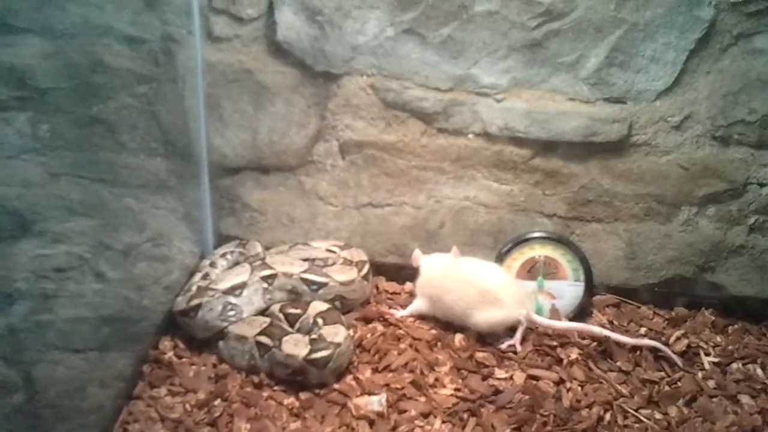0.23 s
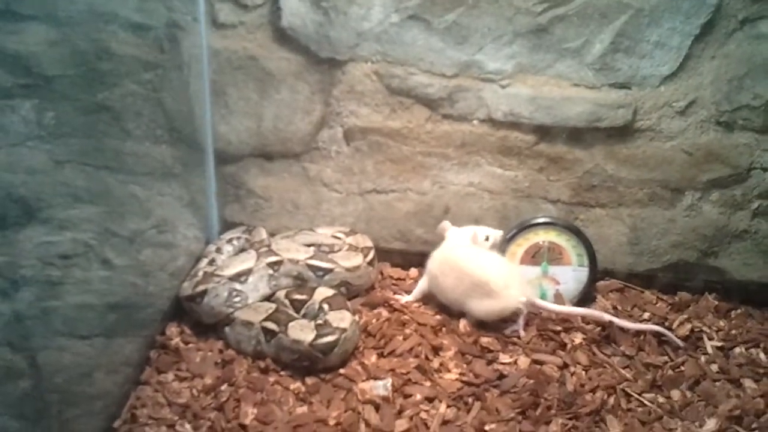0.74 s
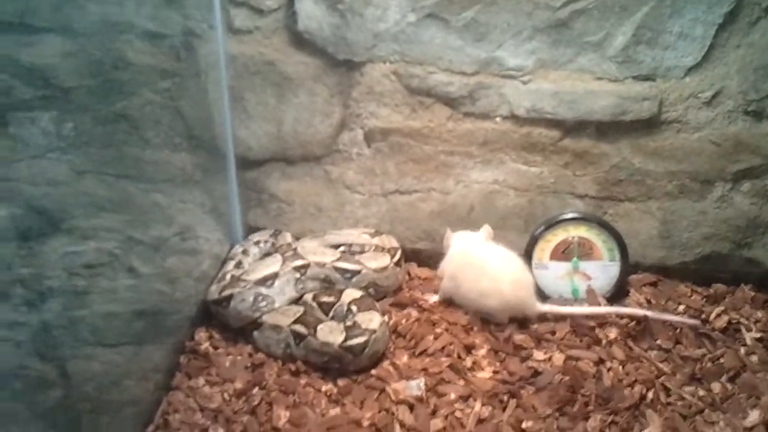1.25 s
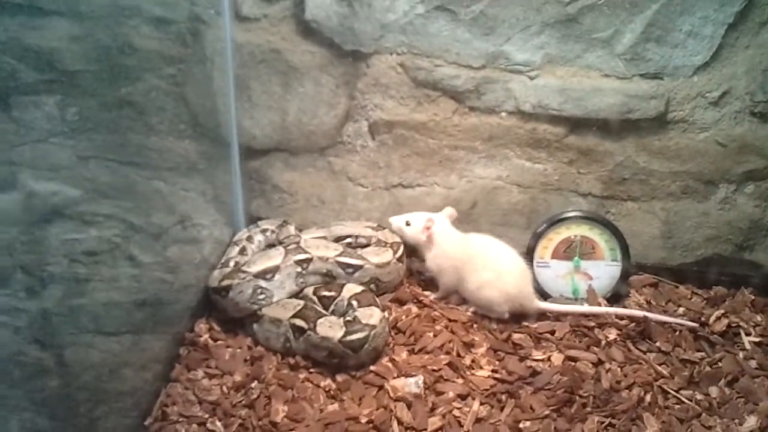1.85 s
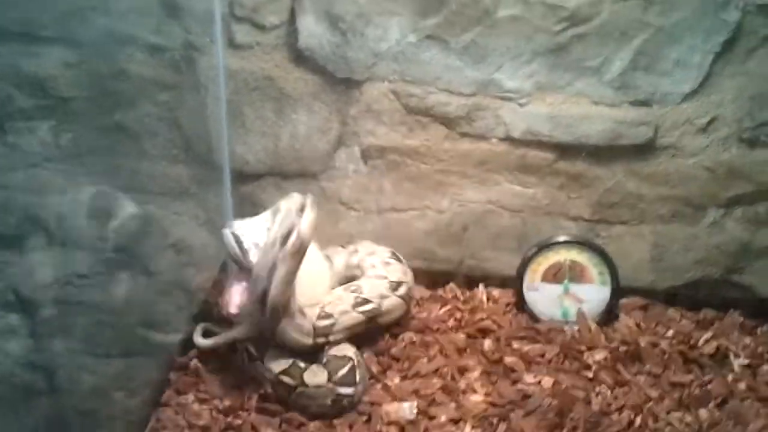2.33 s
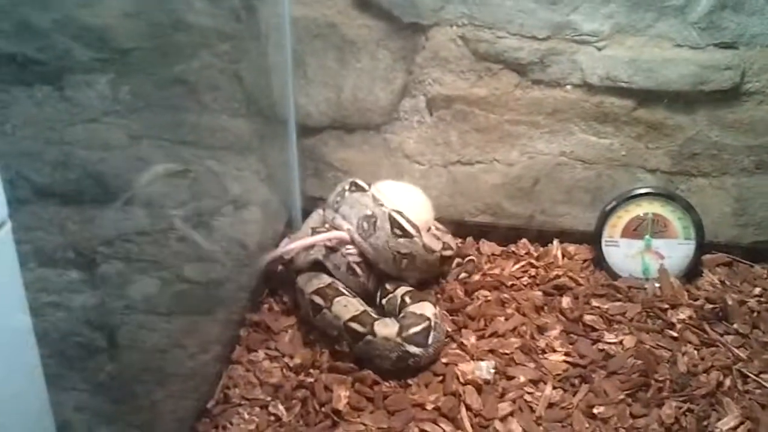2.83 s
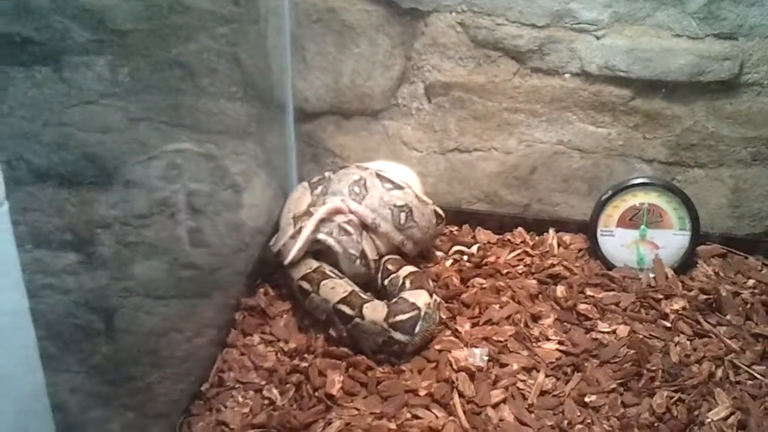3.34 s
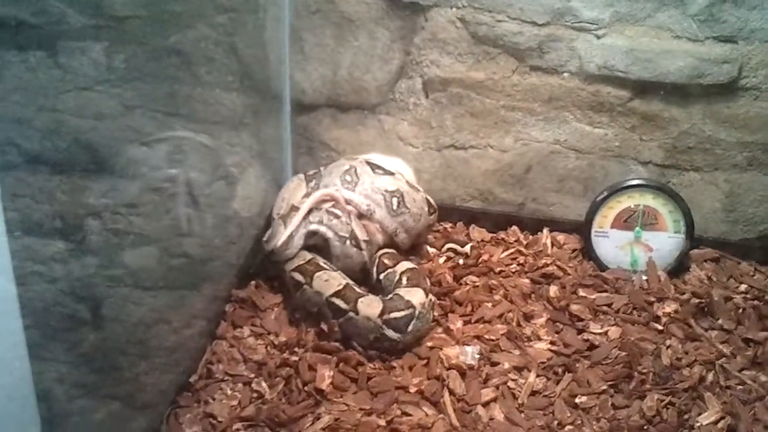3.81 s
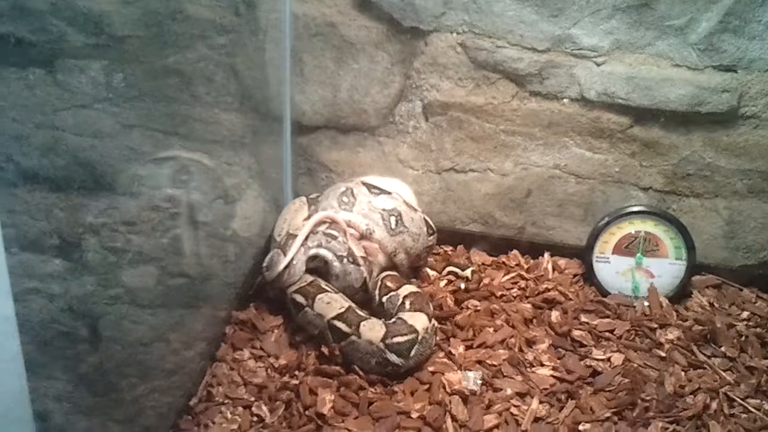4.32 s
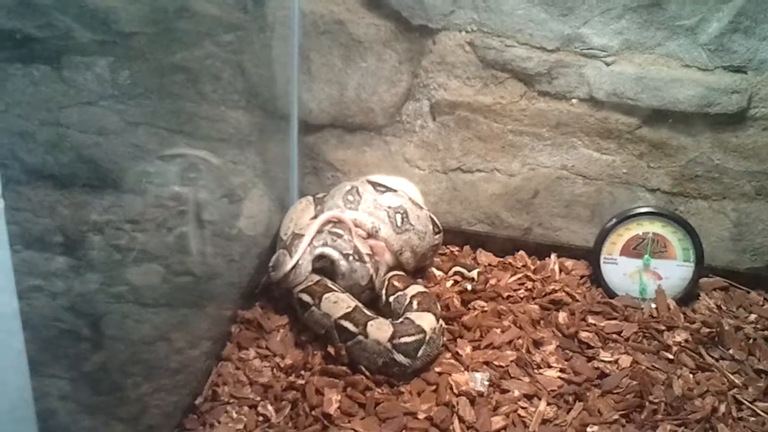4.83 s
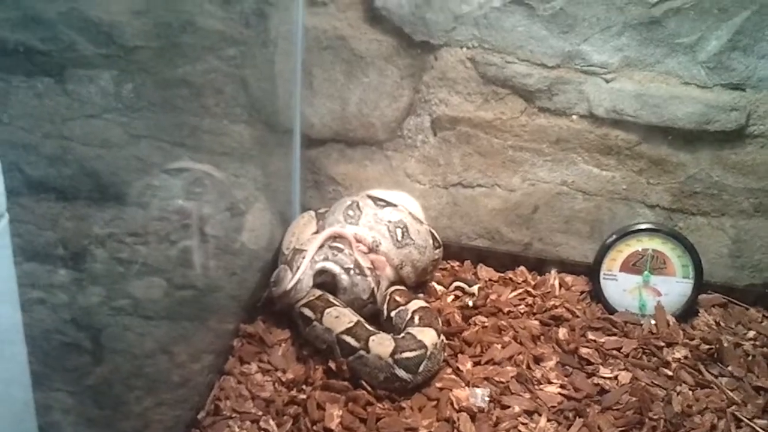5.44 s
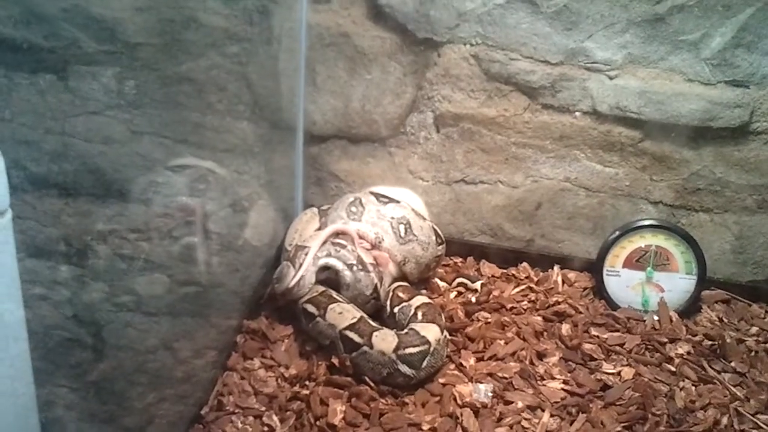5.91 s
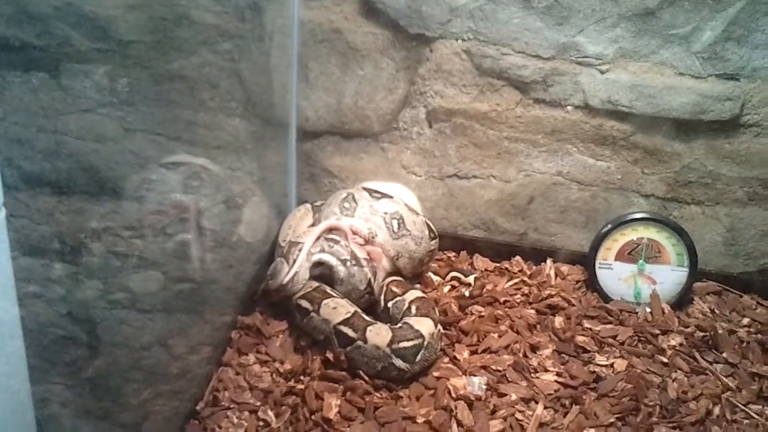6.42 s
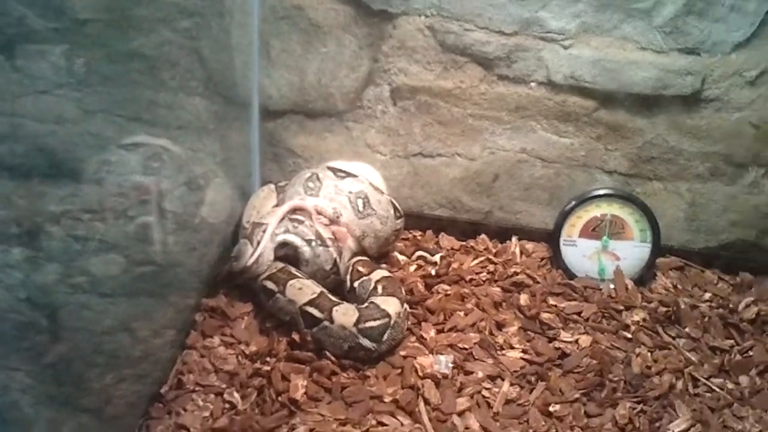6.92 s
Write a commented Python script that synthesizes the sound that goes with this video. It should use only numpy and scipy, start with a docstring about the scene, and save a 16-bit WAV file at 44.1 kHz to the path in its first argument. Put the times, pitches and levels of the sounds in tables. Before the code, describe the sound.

Over faint buzzing hum and hiss, bark chips stir, bodies thump glass, and a rat's trembling squeaks burst into piercing, rasping shrieks, then dwindle.

```python
"""Mains hum and microphone hiss first, and under all: one repeated cycle of overtones, and coloured noise.
Bark chips rustle (dense impulses); dry clicks come from close to the microphone (snap plus low swing).
Then a rat seized by a snake squeals in a glass tank: trembling near-sines break into rasping shrieks
(torn tones, resonated pulses and noise). Bodies thump the glass (decaying modes) over low rumble."""
import sys
import numpy as np
from scipy import signal
from scipy.fft import rfft, irfft, next_fast_len
from scipy.io import wavfile
from scipy.ndimage import uniform_filter1d

SR = 44100
rng = np.random.default_rng(int(sys.argv[2]) if len(sys.argv) > 2 else 0)


def file_out(sig):
    """Save sig as 16-bit WAV at sys.argv[1]."""
    # one column per channel
    cols = np.atleast_2d(sig).T
    # limit, then scale
    lim = np.clip(cols, -1, 1)
    pcm = np.round(lim * 32767).astype(np.int16)
    wavfile.write(sys.argv[1], SR, pcm)


def gain_from_db(level_db):
    """Turn a decibel level (scalar or array-like) into a linear amplitude factor."""
    decades = np.asarray(level_db, float) / 20
    return 10 ** decades


N = 315756

# strongest mains overtones, each set on the nearest multiple of MAINS_HZ: (frequency [Hz], level [dB])
HUM_LINES = [(118.4, -69), (360.7, -63), (597.5, -70), (839.8, -70), (958.2, -64.5), (1200, -74),
             (1319, -75), (3122, -78), (3359, -78), (3418, -76), (4317, -76), (4382, -76), (4560, -76),
             (4619, -76), (4678, -76), (4737, -73), (4802, -72), (4861, -76), (4980, -79), (5222, -80),
             (5642, -79), (5760, -75), (5879, -76), (6239, -79), (6638, -81), (6842, -80), (7197, -80),
             (7617, -80), (7951, -80), (8053, -81)]
# curve for all other overtones, before scatter and odd-overtone cut: (frequency [Hz], level [dB])
BUZZ_CURVE = [(60, -95.5), (400, -69), (1500, -82), (2500, -89), (4500, -88.5), (7500, -82.5), (9000, -110)]
# microphone hiss colour: (frequency [Hz], relative density [dB per Hz])
HISS_COLOUR = [(15, -43), (25, -22), (114, -10), (304, -5), (360, -7.5), (417, -8.5), (960, -10),
               (1080, -13.5), (1900, -14), (3870, -16), (4710, -15), (7880, -15), (8690, -25), (11300, -50),
               (19100, -120)]
# bark chips stirred: (start [s], length [s], rms at the peak [dB])
RUSTLES = [(1.27, 0.084, -50.5), (1.34, 0.062, -60), (1.4, 0.021, -52.5), (2.15, 0.061, -45),
           (2.21, 0.16, -44), (2.47, 0.037, -45.5), (2.58, 0.12, -56.5), (3.34, .033, -47)]
# colour of the chips: (frequency [Hz], relative level [dB])
BARK_COLOUR = [(240, -49), (400, -3.5), (802, -4), (878, -5), (2980, -12.5), (6300, -5), (8690, -19.5),
               (11300, -67), (19100, -120)]
# clicks, levels ahead of the bass cut: (time [s], low push peak [dB], bright snap peak [dB])
CLICKS = [(1.316, -50, -37), (1.346, -44, -44), (2.295, -44, -46), (2.454, -34, -26), (2.577, -44, -52),
          (3.692, -44, -46), (4.272, -37, -41), (6.820, -60, -33), (6.8278, -26, -15)]
# parts of a snap: (frequency [Hz], relative level [dB], t60 [s], peak delay [s])
SNAP_PARTS = [(1900, 0, .003, 0), (3200, -16, .003, 0), (4500, -2, .0035, -.0006), (6200, 0, .0025, .0002),
              (7500, -4, .003, -.0012)]
# the tank and hands shaking the microphone: (start [s], length [s], rms at the peak [dB])
RUMBLES = [(2.12, 0.57, -65), (2.66, 0.19, -57.5), (2.94, .24, -67), (3.44, 0.14, -55.5), (3.82, .14, -74),
           (4.0, 0.12, -74)]
# bodies hitting the glass: (time [s], peak [dB], centre of the blow's colour [Hz])
THUMPS = [(2.178, -41.5, 143), (2.326, -35, 460), (2.408, -30.5, 817), (2.454, -23.5, 617)]
# glass modes: (frequency [Hz], relative level [dB], t60 [s])
GLASS_MODES = [(148.6, 1, 0.38), (199, 1.5, 0.44), (379, -6.5, 0.45), (454, -7.5, 0.19), (595, -2.5, 0.13),
               (795, -7, 0.18), (1050, -9, 0.081), (1395, 10, 0.051), (2194, 18.5, 0.039)]
# how hard the rat pushes air, one list a call: (time [s], effort [dB])
EFFORT = [
    [(2.225, -48), (2.289, -42), (2.32, -42.5)],
    [(2.322, -49), (2.338, -31.5), (2.362, -35.5), (2.398, -45)],
    [(2.4, -67.5), (2.408, -39), (2.422, -39), (2.446, -40), (2.456, -29), (2.476, -55.5), (2.5, -47.5)],
    [(2.52, -54.5), (2.54, -37.5), (2.56, -31), (2.62, -58.5)],
    [(2.68, -57), (2.7, -26.5), (2.722, -16), (2.774, -12.5), (2.85, -33)],
    [(2.93, -35), (2.944, -33), (2.958, -23), (3.016, -24), (3.044, -27), (3.12, -30), (3.17, -53.5)],
    [(3.335, -48), (3.358, -47)],
    [(3.455, -54), (3.465, -37.5), (3.555, -36.5), (3.611, -31), (3.641, -30.5), (3.68, -50)],
    [(3.83, -77), (3.84, -48), (3.858, -39), (3.894, -34.5), (3.962, -37), (3.998, -52.5)],
    [(4.0, -54), (4.016, -45), (4.034, -42), (4.076, -43), (4.1, -72)],
    [(4.712, -64), (4.738, -45.5), (4.764, -46), (4.78, -37.5), (4.874, -39), (4.9, -59)],
]
# whistles start off pitch and settle: (start [s], length [s], level re effort [dB], first [Hz], settled [Hz])
WHISTLES = [(2.23, .03, -6, 3235, 3190), (2.258, .02, -6.5, 3507, 3480), (2.272, 0.038, -3.5, 3035, 2720),
            (2.3, 0.024, -6, 3368, 3250), (2.33, 0.05, -6.5, 3860, 3080), (2.405, 0.075, -4, 3680, 3120),
            (2.535, .055, -14, 3060, 3350), (3.342, 0.018, -9, 2270, 2400), (3.46, .018, -4.5, 3504, 3450),
            (3.476, 0.0768, -6, 3044, 3370), (3.84, .075, -6.5, 3300, 2890), (4.716, .057, 0.5, 3385, 2930),
            (4.775, 0.025, -6.5, 3264, 3360)]
# throat and mouth noise: (start [s], length [s], level re effort [dB], low throat [Hz], bright share [dB])
RASPS = [(2.325, 0.12, -4.5, 1080, -9), (2.402, 0.049, 5.5, 950, -4.5), (2.525, 0.071, -1, 1300, -1.5),
         (2.685, 0.13, -7.5, 1870, 4), (2.935, .225, -4.5, 1380, 3), (3.54, 0.078, -10.5, 1000, 6),
         (3.57, 0.042, -7, 1010, 2), (3.6, 0.046, -3.5, 1170, -3.5), (3.835, 0.23, -1.5, 970, -4.5),
         (4.0, .097, 0, 1320, -3.5), (4.786, .11, -6, 1240, 7.5)]
# mouth resonances: (frequency [Hz], relative level [dB])
MOUTH = [(2400, 0.5), (2950, 7), (3700, 5.5), (4400, 6.5), (5200, 5.5)]
# ringing core, gliding evenly: (start [s], length [s], level re effort [dB], first [Hz], last [Hz])
SHRIEKS = [(2.715, .037, -9, 3364, 4050), (2.752, 0.035, -4.5, 4383, 4450), (2.944, 0.0878, -3, 4700, 4570),
           (3.036, .092, -7, 4580, 4540), (3.56, 0.041, -6, 3750, 3900), (3.6, .058, -9, 4700, 4300),
           (3.86, 0.15, -10.5, 4670, 4300), (4.026, .05, -5, 3874, 3200)]
# second, higher oscillator: (start [s], length [s], level re effort [dB], first [Hz], last [Hz])
SECOND_VOICE = [(2.738, 0.015, -7, 4750, 4850), (2.758, 0.035, -5, 5060, 5100),
                (3.465, 0.078, -10.5, 6100, 5450), (3.525, 0.04, -14, 6260, 5780),
                (4.04, 0.019, -8, 5360, 5350), (4.785, 0.08, -12.5, 4770, 4830)]
# hoarse undertone, folds skipping cycles: (start [s], length [s], level re effort [dB], first [Hz], last [Hz])
UNDERTONES = [(2.95, .17, -20, 850, 843), (3.62, 0.055, -20.5, 888, 877), (3.87, 0.081, -16, 985, 888),
              (4.045, 0.03, -11, 1465, 1402), (4.79, 0.097, -19.5, 1237, 1330)]
# decay between the panes: (frequency [Hz], t60 [s])
TANK_DECAY = [(500, 0.42), (2000, 0.15), (5000, 0.22), (8000, 0.14)]

MAINS_HZ = 60
HISS_RMS_DB = -57.5  # ahead of the treble roll-off
RUSTLE_PEAK_SHARE, RUMBLE_PEAK_SHARE = 0.5, 0.49  # share of the length
SWELL_EDGE_DB = -7  # at both ends, re peak
SETTLE_S = .011
OCTAVE_DB, OCTAVE_DB_PER_KHZ, OCTAVE_DRIFT_DB = -12, 24, 4  # octave at 3 kHz pitch, brighter when higher
RASP_PULSES_PER_S = 1300
MOUTH_SHARPNESS = 5  # centre over width
LOW_THROAT_DB, BRIGHT_HZ, BRIGHT_DRIFT_HZ = -8.5, 6470, 302
CLIP = .7  # input overload, full scale 1


def evened(x):
    """Scales to rms 1."""
    return x / np.sqrt(np.mean(x ** 2) + 1e-20)


def read(points, hz):
    """Value of a spectrum on a log-frequency axis."""
    f, value = np.transpose(points)
    return np.interp(np.log(hz + 1), np.log(f + 1), value)


def coloured(x, points):
    """Filters by a spectrum in dB."""
    size = next_fast_len(len(x))
    gain = gain_from_db(read(points, np.fft.rfftfreq(size, 1 / SR)))
    return irfft(rfft(x, size) * gain, size)[:len(x)]


def add(mix, start_s, sound):
    """Mixes a sound in at start_s."""
    part = mix[round(start_s * SR):][:len(sound)]
    part += sound[:len(part)]


def wander(size):
    """Noise smoothed twice over size samples, rms 1."""
    return evened(uniform_filter1d(uniform_filter1d(rng.standard_normal(N), size), size))


def sparse(per_s, spread_db):
    """Random impulses of either sign, a few of them large."""
    height = gain_from_db(spread_db * np.minimum(rng.exponential(1, N), 4))
    sign = rng.choice([-1., 1.], N)
    return height * sign * (rng.random(N) < per_s / SR)


def gated(spans, size=180):
    """1 inside each (start, length), with edges of size samples."""
    t = np.arange(N) / SR
    inside = sum((t >= s) & (t < s + d) for s, d in spans)
    return uniform_filter1d(np.minimum(inside, 1.), size)


def swells(rows, peak_share):
    """Each row rises to its peak and falls back."""
    t = np.arange(N) / SR
    shape = [SWELL_EDGE_DB, 0, SWELL_EDGE_DB]
    return sum(gated([(s, d)]) * gain_from_db(db + np.interp((t - s) / d, [0, peak_share, 1], shape))
               for s, d, db in rows)


def hum():
    """Mains overtones at random phases: one cycle, repeated."""
    k = np.arange(1, 150)
    db = read(BUZZ_CURVE, k * MAINS_HZ) + 0.83 * rng.standard_normal(len(k))
    db -= 8 * (k % 2) * (k < 16)  # rectified mains: low odd overtones are weaker
    for hz, line_db in HUM_LINES:
        db[round(hz / MAINS_HZ) - 1] = line_db
    period = SR // MAINS_HZ
    turn = np.arange(period) / period
    sines = np.sin(2 * np.pi * (k[:, None] * turn + rng.random((len(k), 1))))
    return np.resize(np.sqrt(2) * gain_from_db(db) @ sines, N)


def hiss():
    """Steady coloured noise of the microphone."""
    return gain_from_db(HISS_RMS_DB) * evened(coloured(rng.standard_normal(N), HISS_COLOUR))


def rustle():
    """Dense dry ticks of chips knocking together."""
    chips = evened(coloured(sparse(per_s=3500, spread_db=2.5), BARK_COLOUR))
    return swells(RUSTLES, RUSTLE_PEAK_SHARE) * chips


def clicks():
    """A bright snap that builds and dies within a few ms, with a damped low swing from its centre."""
    out, t = np.zeros(N), np.arange(-200, 300) / SR
    snap = sum(gain_from_db(db - 60 * abs(t - lag) / t60) * np.cos(2 * np.pi * hz * (t - lag))
               for hz, db, t60, lag in SNAP_PARTS)
    late = np.maximum(t, 0)
    push = -np.sin(2 * np.pi * 950 * late) * np.exp(-late / .0009)
    for s, push_db, snap_db in CLICKS:
        click = gain_from_db(push_db) * push / push.max() + gain_from_db(snap_db) * snap / abs(snap).max()
        add(out, s + t[0], click)
    return coloured(out, [(150, -16), (450, -14), (700, 0), (9000, 0)])  # small parts move little air


def rumble():
    """Lumpy noise, mostly below 100 Hz, from the shaken tank and microphone."""
    lumps = coloured(rng.standard_normal(N), [(15, -22.5), (35, 1.0), (80, 3.5), (140, -23.5), (400, -97.0)])
    return swells(RUMBLES, RUMBLE_PEAK_SHARE) * evened(lumps)


def thumps():
    """Each blow rings the glass modes nearest its own colour."""
    out, t = np.zeros(N), np.arange(SR // 2) / SR
    for s, peak_db, centre_hz in THUMPS:
        ring = 0
        for hz, db, t60 in GLASS_MODES:
            mode_db = db - 15.2 * abs(np.log2(hz / centre_hz))  # dB lost per octave off centre
            ring = ring + gain_from_db(mode_db - 60 * t / t60) * np.sin(2 * np.pi * hz * t)
        ring = ring * (1 - np.exp(-t / .004))  # soft contact
        add(out, s - .002, gain_from_db(peak_db) * ring / abs(ring).max())
    return out


def voiced(rows, size=180):
    """Gain from effort and row level, time into each row, and the row's columns held until the next."""
    rows, t = np.array(rows, float), np.arange(N) / SR
    row = rows[np.maximum(np.searchsorted(rows[:, 0], t) - 1, 0)].T
    effort_db = np.interp(t, *np.concatenate(EFFORT).T)
    gain = gated(rows[:, :2], size) * gain_from_db(effort_db + row[2])
    return gain, np.maximum(t - row[0], 0), row[1], row[3], row[4]


def whistles():
    """A near-sine from the larynx with its octave, hoarse: pitch trembles and the tone keeps breaking."""
    gain, t, _, first_hz, settled_hz = voiced(WHISTLES)
    hz = settled_hz + (first_hz - settled_hz) * np.exp(-t / SETTLE_S)
    tremble = 1 + .024 * wander(size=30) + .013 * wander(size=350)
    phase = 2 * np.pi * np.cumsum(hz * tremble) / SR
    flutter = np.sqrt(2) * gain_from_db(6.5 * np.minimum(wander(size=120), .6))
    octave_db = np.minimum(OCTAVE_DB + OCTAVE_DB_PER_KHZ * (hz / 1000 - 3), 0)
    octave = gain_from_db(octave_db + OCTAVE_DRIFT_DB * wander(size=400))
    return gain * flutter * (np.sin(phase) + octave * np.sin(2 * phase))


def streaked(x, depth_db):
    """Fleeting partials: narrow patches of the spectrum swell for about 20 ms."""
    z = signal.stft(x, nperseg=256, noverlap=192)[2]
    patches = uniform_filter1d(rng.standard_normal(z.shape[::-1]), size=12, axis=0)
    patches = uniform_filter1d(patches, size=2, axis=1)
    swollen = z * gain_from_db(depth_db * evened(patches).T)
    return evened(signal.istft(swollen, nperseg=256, noverlap=192)[1][:N])


def resonate(x, hz, width_hz):
    """A moving resonance: shift the curve hz to zero, smooth twice, shift back."""
    turn = np.exp(2j * np.pi * np.cumsum(hz * np.ones(N)) / SR)
    r = np.exp(-np.pi * width_hz / SR)
    return (turn * signal.lfilter([1], np.convolve([1, -r], [1, -r]), x / turn)).real


def rasps():
    """Chaotic fold closures and turbulent air excite throat and mouth."""
    gain, _, _, low_hz, bright_db = voiced(RASPS, size=400)
    bright_hz = BRIGHT_HZ + BRIGHT_DRIFT_HZ * wander(size=900)
    closures = evened(sparse(RASP_PULSES_PER_S, spread_db=1.5))
    drive = streaked(closures + .9 * rng.standard_normal(N), depth_db=2.5)
    mouth = evened(sum((-1) ** k * gain_from_db(d) * evened(resonate(drive, hz, hz / MOUTH_SHARPNESS))
                       for k, (hz, d) in enumerate(MOUTH)))  # neighbours in opposite polarity
    low = evened(evened(resonate(drive, low_hz, 800)) + 2.0 * evened(resonate(drive, 1300, 2300)))
    bright = evened(evened(resonate(drive, bright_hz, 1800)) + 2.5 * evened(resonate(drive, 6660, 2200)))
    voice = gain * (mouth - gain_from_db(LOW_THROAT_DB) * low - gain_from_db(bright_db) * bright)
    return coloured(voice, [(100, -69), (350, 2.5), (600, -2.5), (9000, -3.0)])  # small body: no bass


def torn_tone(rows, jitter, burst_db):
    """A tone that wavers in pitch and breaks into short bursts."""
    gain, t, length, first_hz, last_hz = voiced(rows, size=600)
    hz = first_hz + (last_hz - first_hz) * np.minimum(t / length, 1)
    phase = 2 * np.pi * np.cumsum(hz * (1 + jitter * wander(size=30))) / SR
    bursts = gain_from_db(burst_db * np.minimum(wander(size=70), 1))
    return gain * np.sqrt(2) * bursts * np.sin(phase)


def shrieks():
    """The tone tears; a second oscillator sounds above it, an undertone below."""
    core = torn_tone(SHRIEKS, jitter=.045, burst_db=4)
    above = torn_tone(SECOND_VOICE, jitter=.028, burst_db=4.5)
    below = torn_tone(UNDERTONES, jitter=.15, burst_db=4.5)
    return core + above + below


def tank(x):
    """Dense reflections between the panes, each band dying at its own speed."""
    hz, t, z = signal.stft(rng.standard_normal(SR // 2), SR, nperseg=256)
    decay = gain_from_db(-60 * t / read(TANK_DECAY, hz)[:, None])
    tail = signal.istft(z * decay, SR, nperseg=256)[1]
    return signal.fftconvolve(x, tail / np.linalg.norm(tail))[:N]


def scene():
    """Voice and scuffle inside the tank, over hum and hiss."""
    inside = rustle() + whistles() + rasps() + shrieks()
    echoes = gain_from_db(-8) * tank(inside)
    return (hum() + hiss() + inside + echoes + clicks() + rumble() + thumps())[None]


def low_pass(x):
    """Removes everything above the highest recorded frequency."""
    return signal.sosfilt(signal.butter(12, 8840, fs=SR, output="sos"), x)


def record(dry):
    """Treble roll-off, then input overload flattens peaks beyond CLIP."""
    rolled = coloured(dry[0], [(20, 0), (7800, 1.0), (8300, -1.5), (8800, -11), (9300, -41.5)])
    mix = np.clip(rolled, -CLIP, CLIP)[None]
    return low_pass(mix)


dry = scene()
out = record(dry)
file_out(out)
```